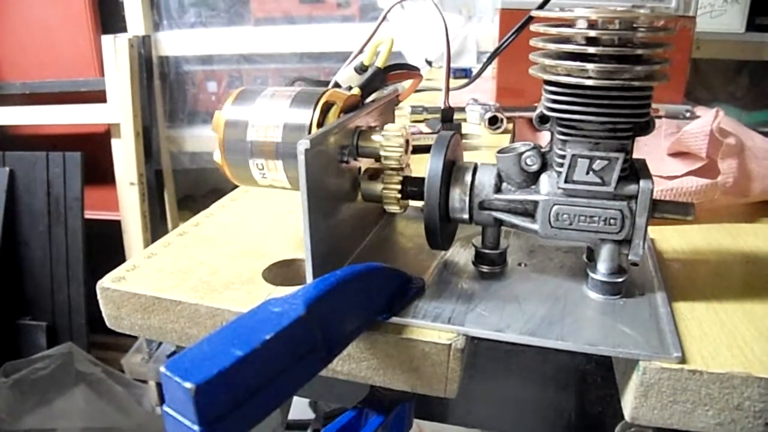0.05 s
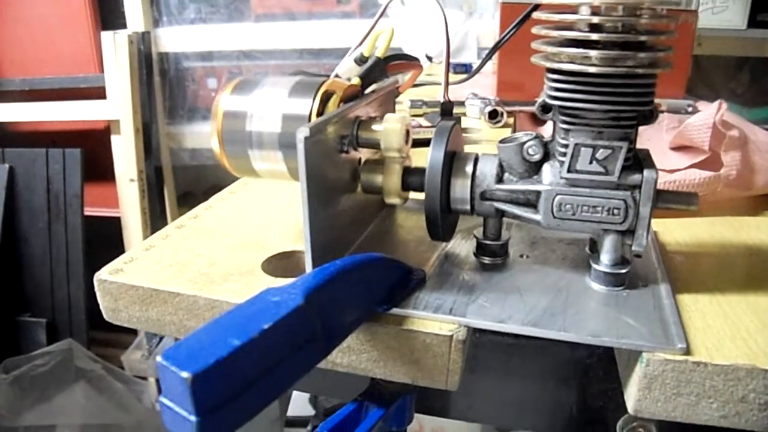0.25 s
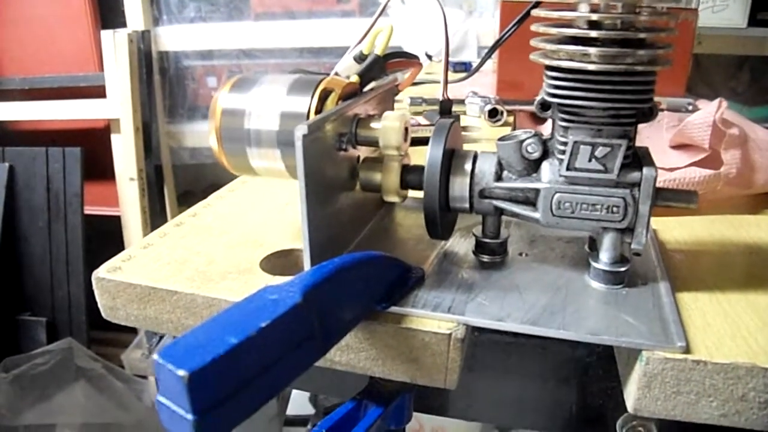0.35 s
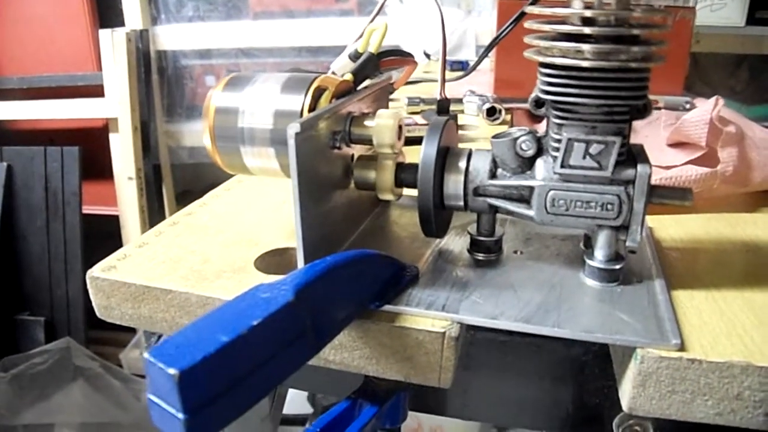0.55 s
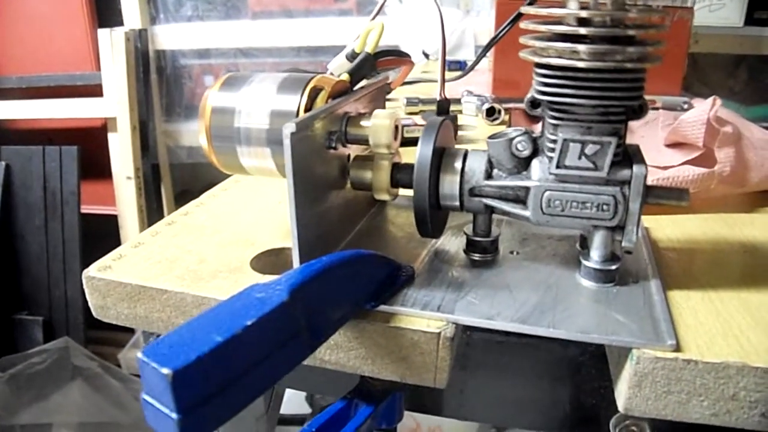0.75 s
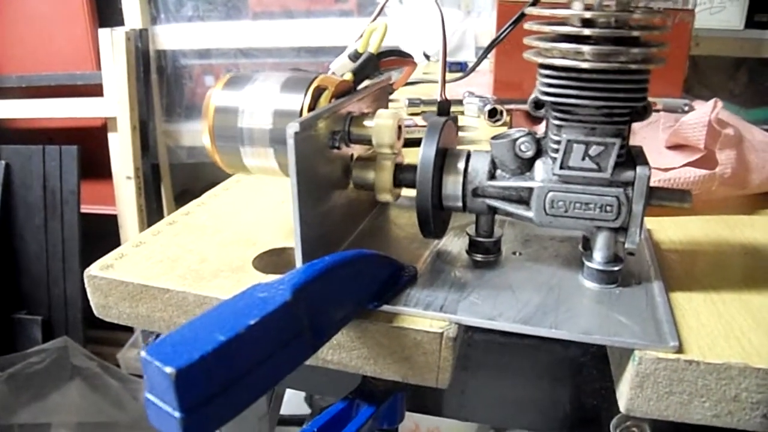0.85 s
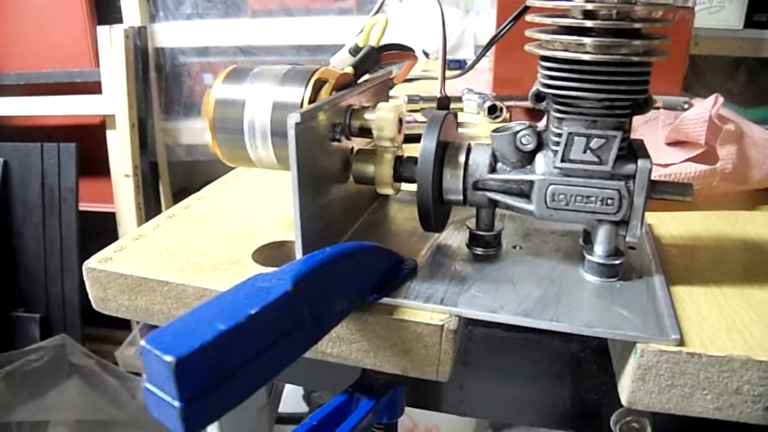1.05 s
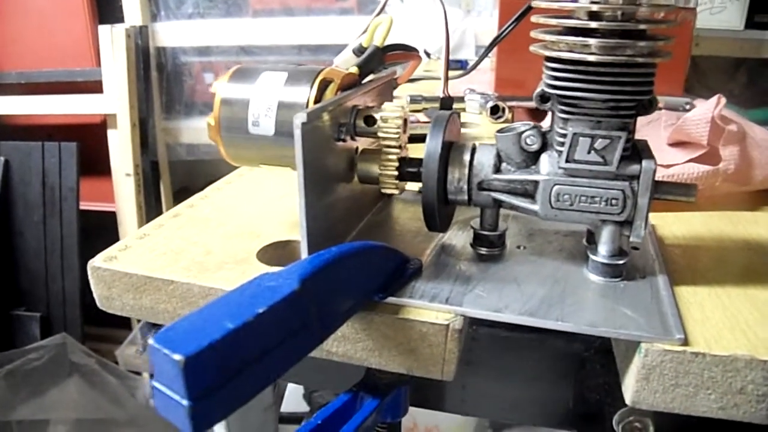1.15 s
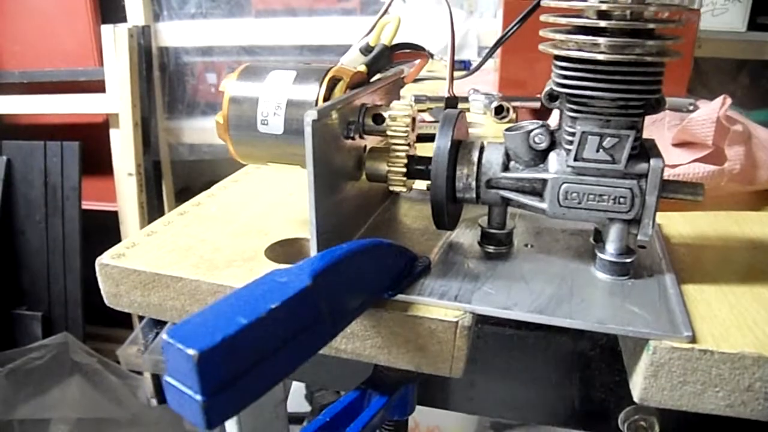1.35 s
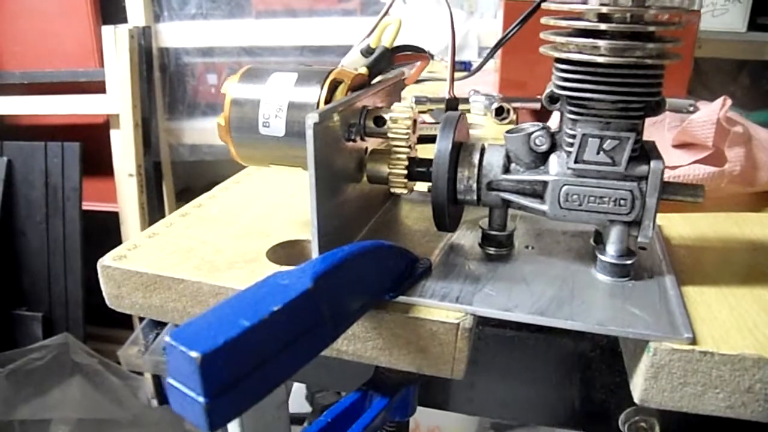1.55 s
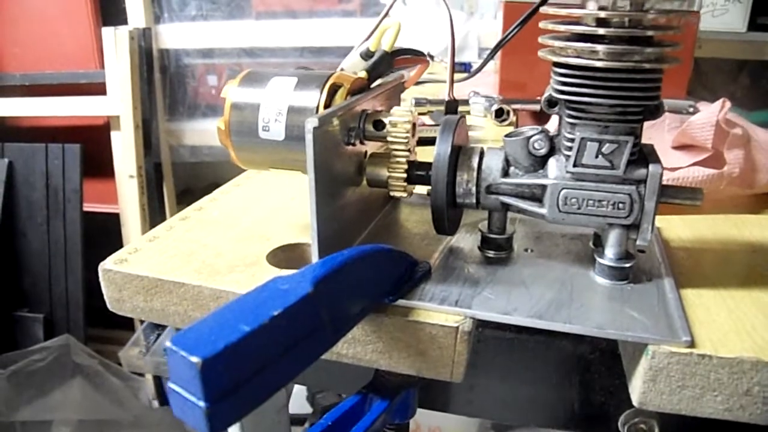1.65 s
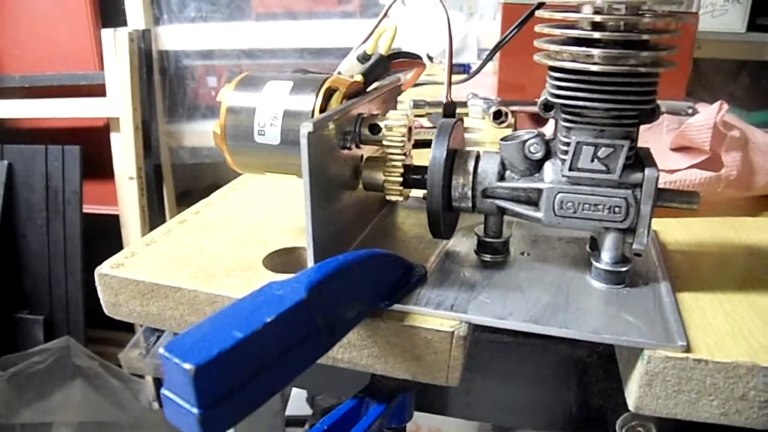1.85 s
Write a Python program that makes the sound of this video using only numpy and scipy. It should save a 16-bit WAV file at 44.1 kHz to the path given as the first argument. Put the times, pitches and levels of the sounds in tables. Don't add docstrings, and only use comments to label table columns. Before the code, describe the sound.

Close up in a small quiet workshop, gear teeth click and stutter, then a motor-driven engine surges into a loud, overloaded metallic whir with rapid puffing, slows sharply, ticks out and leaves faint room noise.

```python
import sys
import numpy as np
from scipy import signal
from scipy.fft import rfft, irfft
from scipy.io import wavfile
from scipy.ndimage import uniform_filter1d

SR = 44100
rng = np.random.default_rng(int(sys.argv[2]) if len(sys.argv) > 2 else 0)


def volts(x):
    e = np.asarray(x, float) / 20
    return 10 ** e


def digitize_waveform(pressure):
    field = np.atleast_2d(pressure).T
    bounded = np.clip(field, -1, 1)
    quanta = np.round(bounded * 32767).astype(np.int16)
    wavfile.write(sys.argv[1], SR, quanta)


N = 83790

# time in seconds, speed in turns per second.
CRANK_SPEED = [(0.15, 0.0), (0.25, 19.82), (0.33, 33.34), (0.42, 60.13), (0.5, 83.35), (0.57, 91.91),
               (0.65, 93.31), (0.78, 94.86), (0.83, 85.98), (0.89, 64.08), (0.95, 39.67), (1.02, 12.33),
               (1.15, 2.0), (1.25, 0.0)]
# time in seconds, extra turns per second.
ROTOR_LURCH = [
    (0, 7.5),
    (.09, 4),
    (.15, 14.5),
]
# time in seconds, level in dB.
TOOTH_LOAD = [(0, -74), (.017, -80), (.024, -41.5), (.09, -28), (.15, -56), (.165, -35.5), (.24, -18.5),
              (.39, -14), (.43, -11.5), (.78, -10.5), (.97, -16), (1.03, -22.5), (1.07, -40), (1.085, -34),
              (1.115, -45.5), (1.2, -58), (1.23, -77.5)]
# time in seconds, level in dB.
WINDING_CURRENT = [(0, -45.5), (.03, -35), (.14, -40), (.17, -33.5), (.4, -31), (.5, -36), (.8, -44),
                   (.86, -63.5)]
# frequency in Hz at full speed, level in dB,
# decay to -60 dB in seconds, power by which the pitch follows speed.
PORT_MODES = [(231, -16.5, .03, 0.056), (505, -19.5, 0.0083, 0.22), (641, -8, 0.033, 0.061),
              (757, -5.5, 0.043, 0.48), (815, -4.5, 0.016, 0.057), (1085, -2, .015, 0.2),
              (1411, -15, 0.052, .6)]
# count per turn, level in dB, timing jitter as a share of the gap, # size spread in dB.
REGULAR_BLOWS = [(29, -6, .15, 6), (15, -4, .08, 4), (22, -10, .12, 5)]
# centre in Hz, depth in dB,
# crest as a share of the turn, lag of the left side in seconds.
RATTLE_SWELL = [(900, 4, 0.94, 0.000041), (2400, 4, 0.71, 0.000029), (5500, 3.5, 0.34, 0.00019),
                (8900, 4.5, 0.19, .00023)]
# frequency in Hz, level in dB.
CASING_COLOUR = [(100, -38), (500, -8), (1300, 0), (2400, 3.5), (4300, -6), (6300, -6), (10000, 0),
                 (11900, -11.5)]
# centre in Hz, width in Hz, lift in dB.
CASING_HUMPS = [(2150, 100, -2), (2884, 83, -5), (5300, 400, -1), (6400, 1800, 6.5), (11200, 240, 3.5),
                (3430, 200, 4.5)]
# frequency in Hz, level in dB, decay to -60 dB in seconds.
BRACKET_MODES = [(2070, -41, .1), (2245, -42, .08), (1290, -45, .07), (2370, -43, .09), (3010, -45, .08),
                 (5240, -44, .06), (5480, -44, .06), (6390, -46, .06), (10400, -45, .06), (2730, -42, .1)]
# frequency in Hz, level in dB, decay to -60 dB in seconds.
BRACKET_BELL = [(2455, -72, 1.25), (2546, -77, .7)]
# start in seconds, peak in dB, ring in Hz.
LONE_TEETH = [(0.019, -30.5, 3520), (0.02, -30.5, 9600), (0.0309, -27, 3480), (0.041, -27, 3320),
              (0.053, -30, 2960), (0.0615, -22.5, 3180), (0.077, -34, 900), (0.096, -39, 2400),
              (.164, -32, 5500), (0.1692, -20, 3170), (0.18, -22, 3226), (0.203, -25.5, 1449),
              (0.2736, -14, 2900), (1.086, -25, 5430), (1.088, -31, 2410), (1.096, -32, 9900),
              (1.104, -28, 5260), (1.126, -34, 5450), (1.141, -35, 5300), (1.158, -36, 5240),
              (1.1634, -43.5, 10000), (1.172, -39, 2333), (1.188, -49.5, 7760), (1.191, -45.5, 2220),
              (1.2113, -47.5, 7960), (1.211, -45.5, 2217)]
# start in seconds, peak in dB.
ROOM_KNOCKS = [(1.64, -51.5), (1.749, -57), (1.818, -62), (1.872, -58), (1.888, -51.5)]
# frequency in Hz, level in dB.
AIR_COLOUR = [(15, -27.5), (25, 10), (265, -4), (478, 1.5), (884, 2.5), (1090, -2), (1270, -0.5),
              (9130, -8), (11500, -23), (15000, -50), (22000, -120)]

LEFT_LAG_S, PORT_LAG_S, LEFT_DB, PORT_LEFT_DB = .00012, .0001, -0.38, -0.08


def rms_one(x):
    return x / np.sqrt(np.mean(x ** 2) + 1e-20)


def in_time(rows, after):
    return np.interp(np.arange(N) / SR, *np.transpose(rows), right=after)


def band(x, low_hz, high_hz):
    return signal.sosfilt(signal.butter(2, [low_hz, high_hz], "band", fs=SR, output="sos"), x)


def ring(x, hz, t60):
    radius = volts(-60 / (t60 * SR))
    angle = 2 * np.pi * hz / SR
    return signal.lfilter([0, np.sin(angle)], [1, -2 * radius * np.cos(angle), radius ** 2], x + 1e-18)


def coloured(x, spectrum, humps=()):
    hz = np.linspace(1, SR / 2, 2049)
    f, level = np.transpose(spectrum)
    db = np.interp(np.log(hz), np.log(f), level)
    for centre, width, lift in humps:
        db = db + lift / (1 + (2 * (hz - centre) / width) ** 2)
    cepstrum = irfft(db * np.log(10) / 20)
    cepstrum[1:2048] *= 2
    cepstrum[2049:] = 0
    impulse = irfft(np.exp(rfft(cepstrum)))
    return signal.fftconvolve(x, impulse[None], axes=-1)[:, :N]


def passes(turns, count):
    return np.flatnonzero(np.diff(np.floor(turns * count)) > 0)


def stereo(x, lag_s, left_db):
    hz = np.fft.rfftfreq(N, 1 / SR)
    late = irfft(rfft(x[0]) * np.exp(-2j * np.pi * hz * lag_s), N)
    return np.array([volts(left_db) * late, volts(-left_db) * x[-1]])


def quiet_room():
    noise = rng.standard_normal((2, N)) + .6 * rng.standard_normal(N)
    hiss = volts(-65) * rms_one(coloured(noise, AIR_COLOUR))
    gusts = (rng.random((2, N)) < 45 / SR) * rng.standard_normal((2, N)) + 1e-18
    lumps = volts(-72) * rms_one(band(gusts, 20, 170))
    clicks = np.zeros(N)
    for start, db in ROOM_KNOCKS:
        clicks[int(start * SR)] = -volts(db)
    knocks = ring(clicks, hz=500, t60=.022) + 0.38 * ring(clicks, hz=1460, t60=0.014)
    return hiss + lumps + knocks


def workshop(x):
    room_db, t60 = -17, .22
    t = np.arange(SR // 2) / SR
    tail = rng.standard_normal((2, len(t))) * volts(-60 * t / t60) * (t > .004)
    tail = signal.lfilter([.5], [1, -.5], tail)
    tail = tail / np.sqrt(np.sum(tail[0] ** 2))
    return volts(room_db) * signal.fftconvolve(x, tail, axes=-1)[:, :N]


def bench():
    bench_db, t60 = -33, .7
    keep = volts(-60 / (t60 * SR))
    shake = signal.lfilter([1 - keep], [1, -keep], volts(in_time(TOOTH_LOAD, after=-120)))
    rumble = rms_one(band(rng.standard_normal(N), 90, 800))
    return stereo([volts(bench_db) * shake * rumble], PORT_LAG_S, PORT_LEFT_DB)


def motor_whine(rotor_turns):
    chop_hz, poles_per_turn, sideband_depth = 7749, 15, .45
    wander = np.cumsum(rng.standard_normal(N)) * .01
    poles = 2 * np.pi * poles_per_turn * rotor_turns + wander
    chop = np.sin(2 * np.pi * chop_hz * np.arange(N) / SR)
    tone = chop * (1 + sideband_depth * np.cos(poles))
    magnet_bell = rms_one(ring(rng.standard_normal(N), hz=3170, t60=2.2 / 60))
    current = volts(in_time(WINDING_CURRENT, after=-120))
    return stereo([current * (tone + volts(-13) * magnet_bell)], LEFT_LAG_S, LEFT_DB)


def lone_teeth():
    crack_t60, ring_t60, lift_db = .012, .028, 2.5
    out, t = np.zeros(N), np.arange(2000) / SR
    for start, db, hz in LONE_TEETH:
        crack = rng.standard_normal(len(t)) * volts(-60 * t / crack_t60)
        rough_ring = ring(crack, hz, ring_t60 * min(1, (3300 / hz) ** 2))
        rough_ring = rough_ring / np.abs(rough_ring).max()
        out[int(start * SR):][:len(t)] += volts(db + lift_db) * (.35 * crack + 0.9 * rough_ring)
    out = signal.sosfilt(signal.butter(2, 500, "high", fs=SR, output="sos"), out)
    return stereo([out], LEFT_LAG_S, LEFT_DB)


def contacts(turns):
    chatter_per_s, chatter_db, size_spread_db, one_sided = 6000, 0.5, 2.2, 1.4
    sizes = volts(size_spread_db * np.minimum(rng.exponential(1, (3, N)), 4))
    sizes = sizes * rng.choice([-1, 1], (3, N))
    chatter = rms_one(sizes * (rng.random((3, N)) < chatter_per_s / SR))
    teeth = np.zeros(N + SR)
    for per_turn, db, jitter, spread_db in REGULAR_BLOWS:
        at = passes(turns, count=per_turn)
        gap = np.gradient(at)
        late = np.abs(jitter * gap * rng.standard_normal(len(at)))
        blows = volts(db + spread_db * rng.standard_normal(len(at)))
        blows = blows * np.sqrt(np.minimum(gap, 60))
        np.add.at(teeth, (at + np.minimum(late, 99)).astype(int), blows)
    teeth = teeth[:N] - uniform_filter1d(teeth[:N], size=64)
    return rms_one(teeth + volts(chatter_db) * (chatter[0] + one_sided * chatter[1:]))


def gears(speed, turns):
    hits, load = contacts(turns), volts(in_time(TOOTH_LOAD, after=-120))
    bracket = np.zeros(N)
    for k, (hz, db, t60) in enumerate(BRACKET_MODES + BRACKET_BELL):
        bracket += volts(db) * ring(load * hits[k % 2], hz, t60)
    out = stereo([bracket], PORT_LAG_S, LEFT_DB)
    casing = rfft(rms_one(coloured(hits, CASING_COLOUR, CASING_HUMPS)))
    log_hz = np.log(np.fft.rfftfreq(N, 1 / SR) + 1)
    centres = np.log([row[0] for row in RATTLE_SWELL])
    for share, (hz, depth_db, crest, lag_s) in zip(np.eye(len(RATTLE_SWELL)), RATTLE_SWELL):
        rattle = irfft(casing * np.interp(log_hz, centres, share), N)
        depth = depth_db * np.sqrt(speed / speed.max())
        swell = volts(depth * np.cos(2 * np.pi * (turns - crest)))
        out += stereo(load * swell * rattle, lag_s, LEFT_DB)
    return out


def engine_puffs(speed, turns):
    puff_db, db_per_octave, spread_db = -9, 4.5, 2.84
    port_opens_turn, lead_s, stall_speed = .55, .0012, 12
    at = passes(turns - port_opens_turn + 1, count=1)
    at = at[speed[at] > stall_speed]
    paces = speed[at] / speed.max()
    gains = volts(puff_db + db_per_octave * np.log2(paces) + spread_db * rng.standard_normal(len(at)))
    t, out = np.arange(2500) / SR, np.zeros(N + SR)
    for i, gain, pace in zip(at - int(lead_s * SR), gains, paces):
        for hz, db, t60, follow in PORT_MODES:
            mode = np.sin(2 * np.pi * hz * pace ** follow * t)
            out[i:i + len(t)] -= gain * volts(db - 60 * t / t60) * mode
    puffs = band(out[:N], 230, 1400)
    unbalance_hum = volts(-43) * speed / speed.max() * np.sin(2 * np.pi * turns)
    return stereo([puffs + unbalance_hum], PORT_LAG_S, PORT_LEFT_DB)


def scene():
    speed = in_time(CRANK_SPEED, after=0)
    turns = np.cumsum(speed) / SR
    rotor_turns = turns + np.cumsum(in_time(ROTOR_LURCH, after=0)) / SR
    rig = engine_puffs(speed, turns) + gears(speed, turns)
    rig = rig + bench() + lone_teeth() + motor_whine(rotor_turns)
    return rig + workshop(rig) + quiet_room()


def low_pass(x):
    return signal.sosfilt(signal.butter(12, 12130, fs=SR, output="sos"), x)


def record(dry):
    preamp_top = 1.35
    x = band(volts(1) * dry, 28, 12000)
    x = preamp_top * np.tanh(x / preamp_top)
    x = signal.sosfilt(signal.cheby2(14, 70, 12630, fs=SR, output="sos"), x)
    return low_pass(np.clip(x, -1, 1))


dry = scene()
out = record(dry)
digitize_waveform(out)
```